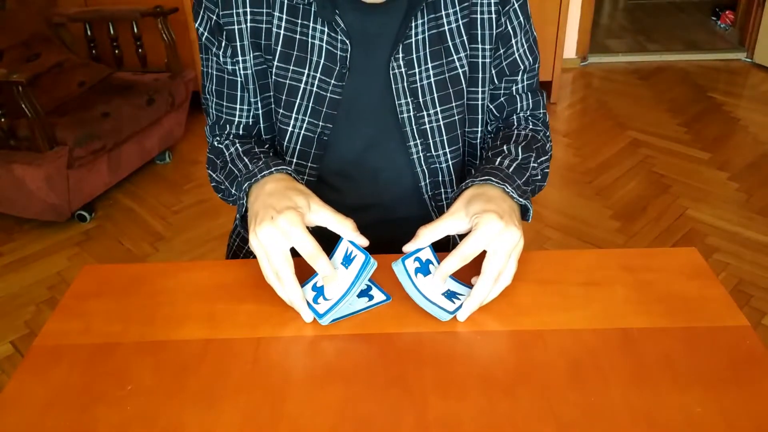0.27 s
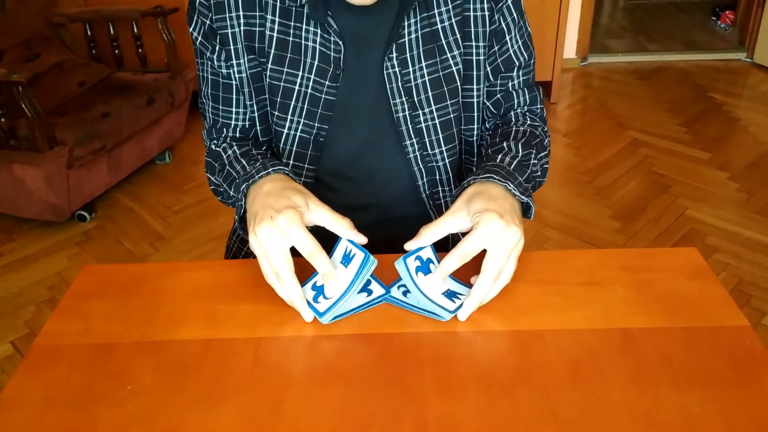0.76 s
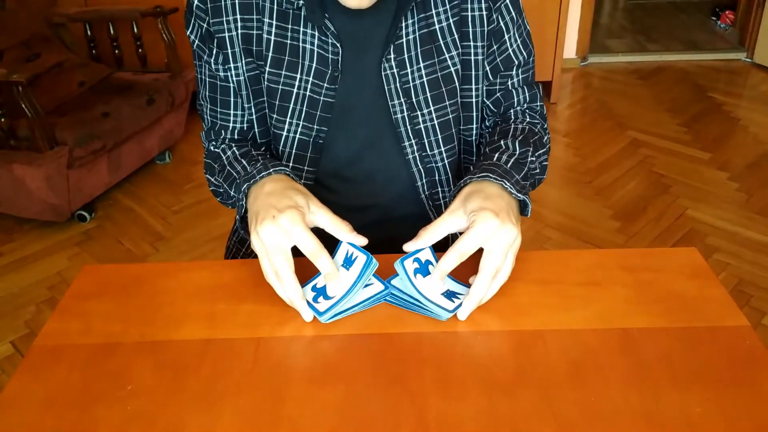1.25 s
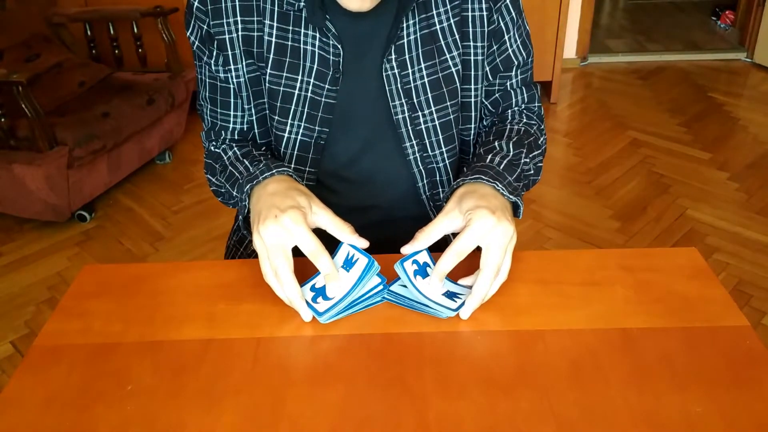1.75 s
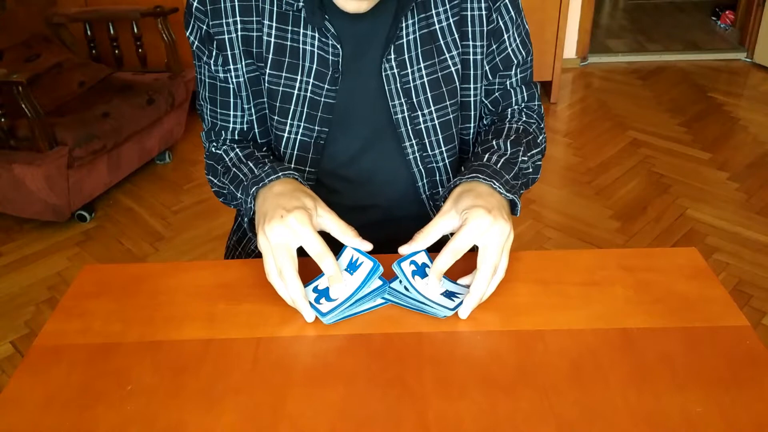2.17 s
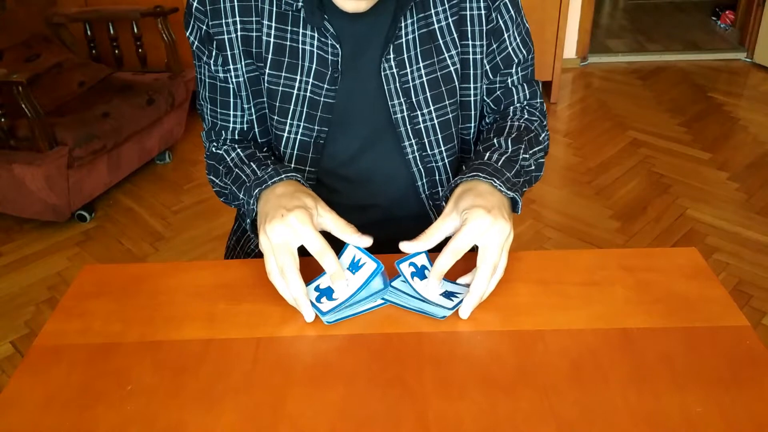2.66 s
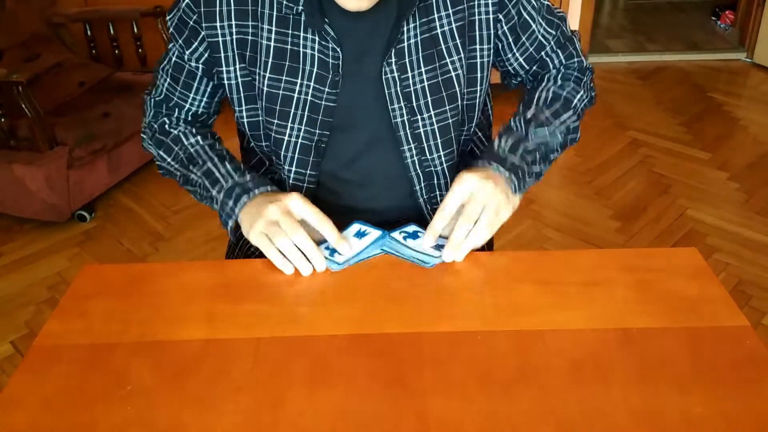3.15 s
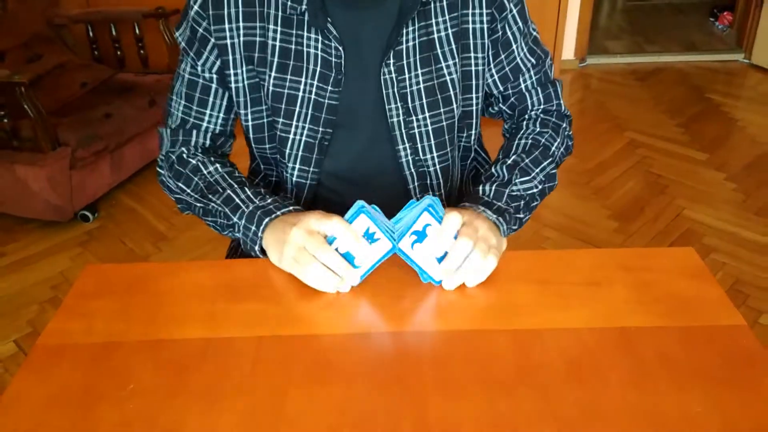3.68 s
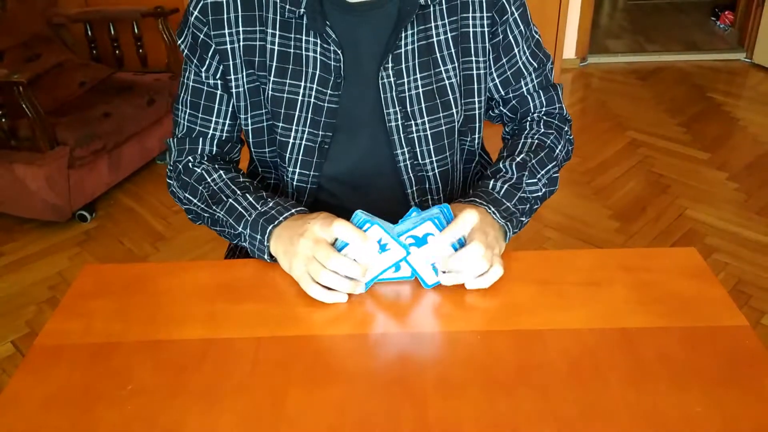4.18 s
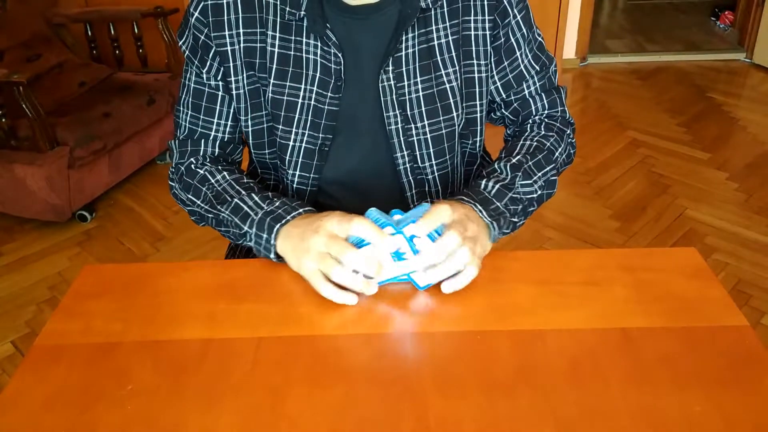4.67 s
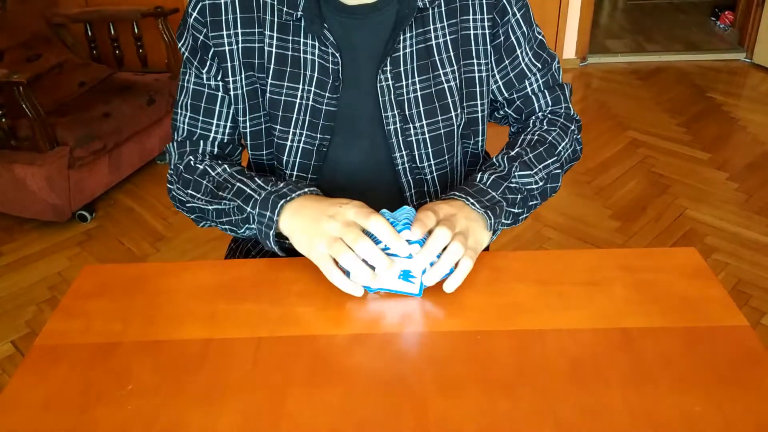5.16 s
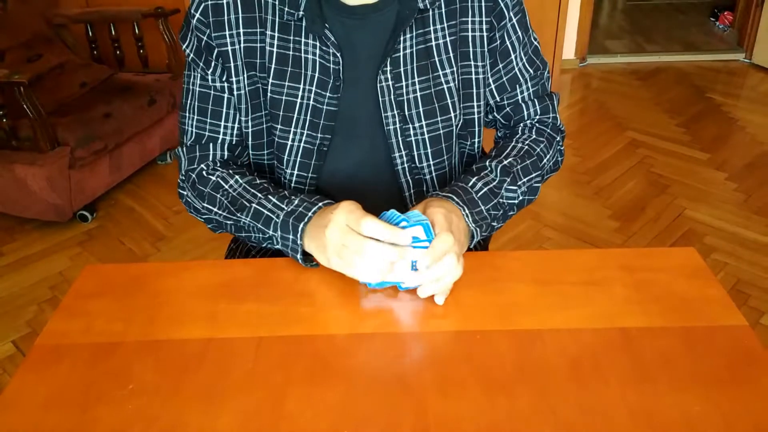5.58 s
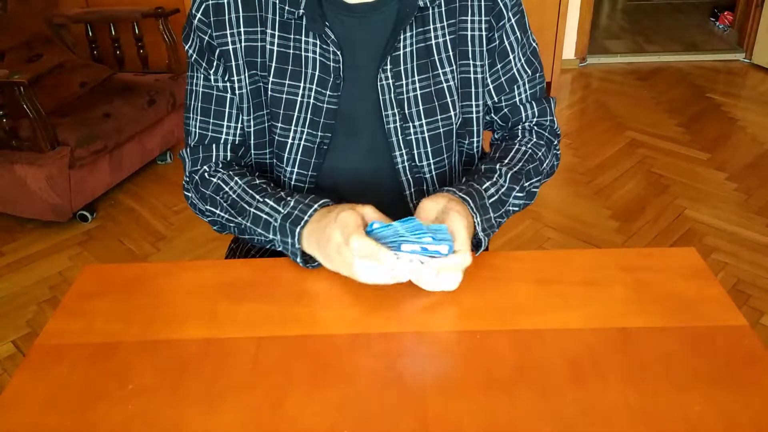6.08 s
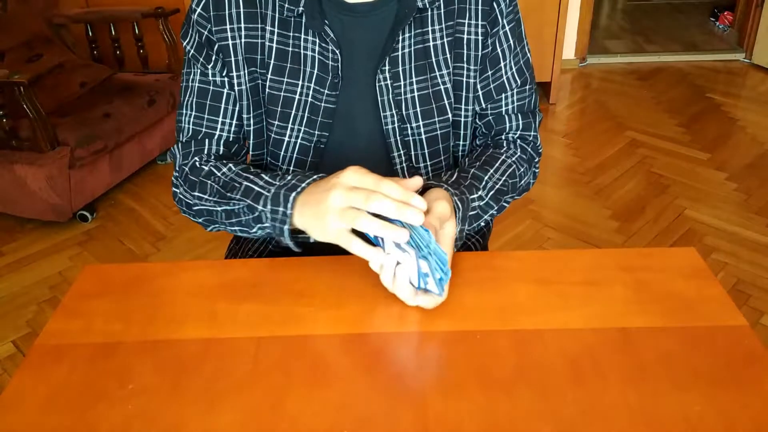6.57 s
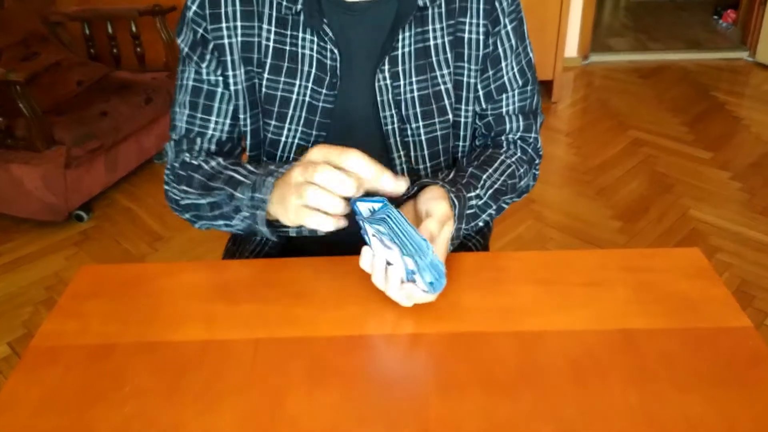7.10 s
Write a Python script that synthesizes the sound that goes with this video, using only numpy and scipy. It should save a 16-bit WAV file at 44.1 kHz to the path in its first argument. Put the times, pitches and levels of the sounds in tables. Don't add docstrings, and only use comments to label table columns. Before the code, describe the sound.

Playing cards flick sparsely off the thumbs, hiss together, buckle with papery snaps and get tapped square on a wooden table, then near silence.

```python
import sys
import numpy as np
from scipy import signal
from scipy.fft import rfft, irfft, next_fast_len
from scipy.io import wavfile
from scipy.ndimage import uniform_filter1d, minimum_filter1d

SR = 44100
rng = np.random.default_rng(int(sys.argv[2]) if len(sys.argv) > 2 else 0)


def wav_out(sig):
    wavfile.write(sys.argv[1], SR, np.round(np.clip(np.atleast_2d(sig).T, -1, 1) * 32767).astype(np.int16))


def invert_db(level):
    return 10 ** (np.asarray(level, dtype=float) / 20)


N = 323694


def unit(x):
    return x / np.sqrt(np.mean(x ** 2) + 1e-20)


def along(points, hz):
    f, v = np.transpose(points)
    return np.interp(np.log(hz + 1), np.log(f + 1), v)


def filtered(x, response):
    n = x.shape[-1]
    m = next_fast_len(n + 2048)
    return irfft(rfft(x, m) * response(np.fft.rfftfreq(m, 1 / SR)), m)[..., :n]


def colour(spectrum):
    return lambda hz: invert_db(along([(1, -120)] + list(spectrum) + [(SR / 2, -120)], hz))


def paired(two, alike):
    def turn(hz):
        return np.arccos(np.clip(along(alike, hz), -1, 1)) / 2
    mid, side = filtered(two, lambda hz: np.array([np.cos(turn(hz)), np.sin(turn(hz))]))
    return np.array([mid + side, mid - side])


def add(out, sound, s):
    out[:, round(s * SR):][:, :sound.shape[-1]] += sound


# f/Hz, t60/s
ROOM_DECAY = [(200, 0.3), (600, 0.33), (1500, 0.34), (4000, 0.37), (9000, 0.41), (11800, .41),
              (12600, 0.38), (16000, .27)]
# f/Hz, likeness/1
ROOM_COHERENCE = [(60, 0.65), (290, 0.92), (640, 0.24), (1400, 0.016), (3000, 0.0078)]


def room(x):
    hz, t, z = signal.stft(rng.standard_normal((2, SR // 3)), SR, nperseg=256)
    swell = 1 - np.exp(-(t / 0.006) ** 2)
    uneven_db = rng.normal(0, 3, (len(hz), 1)) + rng.normal(0, 1.5, len(t)) + rng.normal(0, 3, z.shape[1:])
    decay_db = -60 * t / along(ROOM_DECAY, hz)[:, None]
    tail = signal.istft(z * swell * invert_db(uneven_db + decay_db), SR, nperseg=256)[1]
    return signal.fftconvolve(x[None], paired(tail, ROOM_COHERENCE), axes=1)


# f/Hz, level/dB
SLAP_SPECTRUM = [(130, -27), (230, -8), (350, 1.5), (600, -4), (1000, -32)]
# f/Hz, level/dB
FLEX_SPECTRUM = [(300, -30.5), (700, 1.5), (1300, 3), (2300, -0.5), (3300, -9.5), (6000, -44.5)]
# f/Hz, level/dB
EDGE_SPECTRUM = [(1800, -11), (3500, -1), (5000, 0.5), (7500, -4), (11000, -26.5)]
# f/Hz, level/dB
TICK_SPECTRUM = [(5000, -25), (8500, -4.5), (11500, 4.5), (13500, 1.5), (15500, 0.5), (17000, -6)]


def card(x, levels_db):
    parts = (SLAP_SPECTRUM, FLEX_SPECTRUM, EDGE_SPECTRUM, TICK_SPECTRUM)
    return sum(invert_db(db) * unit(filtered(x, colour(part))) for db, part in zip(levels_db, parts))


def shares(hardness, duller_db, brighter_db):
    step = np.arange(4) - hardness
    return -np.maximum(step * brighter_db, -step * duller_db)


def strokes(rows, weights):
    s, rise, fall, db = np.transpose(rows)[:4, :, None]
    t = np.arange(0, N / SR, .001)
    swing_db = 25
    gains = np.transpose(weights) @ invert_db(db - swing_db * np.maximum((t - s) / fall, (s - t) / rise))
    return np.array([np.interp(np.arange(N) / SR, t, g) for g in gains])


# peak t/s, rise t/s, fall t/s, level/dB
ARM_SHIFTS = [(.3, 0.23, .25, -58), (.45, 0.03, 0.33, -41), (1.22, 0.55, 0.098, -59),
              (1.33, 0.03, 0.17, -46.5), (1.88, 0.2, 0.12, -53.5), (2.0, 0.17, 0.13, -56.5),
              (2.131, 0.14, 0.045, -57), (2.31, 0.21, 0.88, -56.5), (2.57, 0.071, 0.35, -49.5),
              (3.0, 0.021, 0.14, -56), (3.21, 0.049, 0.1, -44.5), (3.37, 0.1, 0.32, -44),
              (3.64, 0.031, 0.39, -44), (3.98, 0.12, 0.42, -46), (4.18, 0.77, 0.026, -49.5),
              (4.31, 0.14, 0.6, -68.5), (4.6, .3, .08, -60), (4.89, .15, 0.45, -54.5),
              (5.46, 0.13, 0.12, -51.5), (5.78, 0.66, 0.67, -79), (6.09, 1, 0.086, -56.5),
              (6.21, 0.066, 0.22, -70.5), (6.46, .5, 0.14, -68), (6.73, 0.12, 0.31, -54),
              (7.05, .4, 0.12, -62), (7.2, 0.16, 0.21, -56)]
# f/Hz, density/dB per Hz
RUMBLE_SPECTRUM = [(12, -33), (21, 4.5), (43, -2.5), (65, -10), (102, -8), (140, -20), (250, -26),
                   (320, -60.5), (550, -120)]
# f/Hz, density/dB per Hz
HISS_SPECTRUM = [(76, -39.5), (130, -8.5), (173, -1.5), (260, -13), (345, -9.5), (598, -12.5), (748, -12),
                 (1060, -16.5), (1830, -18), (1980, -18), (3730, -22.5), (14900, -18.5), (16800, -46)]


def background():
    rumble = filtered(rng.standard_normal((2, N)), colour(RUMBLE_SPECTRUM))
    rumble = unit(paired(rumble, [(30, .85), (130, .75)]))
    hiss = unit(filtered(rng.standard_normal((2, N)), colour(HISS_SPECTRUM)))
    resting_db, hiss_db = -72.5, -74.5
    arms = invert_db(resting_db) + strokes(ARM_SHIFTS, np.ones((len(ARM_SHIFTS), 1)))[0]
    return invert_db(-3.5) * arms * rumble + invert_db(hiss_db + 3.5) * hiss


# t/s, sheen level/dB
SHEEN_COURSE = [(.27, 4), (.46, -1.5), (.97, 10), (1.13, -5), (1.3, -6), (2.08, 2.5), (2.13, 10.5),
                (2.41, 6), (2.58, -3.5), (2.65, -7), (2.76, 7.5), (2.82, 2), (3.7, -1.5)]
# f/Hz, level/dB per dB of sheen
SHEEN_TILT = [(1200, 0), (3000, -1), (6000, -0.08), (9000, -0.15), (13000, 0.1), (16000, 0.3)]
DIRECT_DB = [-6, -6.5, -4.5, -1.5]


def snap(out, s, parts_db, walls_db, rebound_db):
    t = np.arange(SR // 50) / SR - .01
    crackle_s, lead_in_s, rebound_s = .0055, .009, .0018
    echo_db = [-30.5, -18.5, -12, -8.5]
    sheen_db = np.interp(s, *np.transpose(SHEEN_COURSE))

    def sheen(hz):
        return invert_db(sheen_db * along(SHEEN_TILT, hz))

    shape = invert_db(np.where(t > 0, -60 * t / crackle_s, -24 + 60 * t / lead_in_s))
    rebound = (t > rebound_s) * invert_db(rebound_db - 60 * (t - rebound_s) / crackle_s)
    crackle = rng.standard_normal(len(t)) * (shape + rebound)
    direct_db = np.add(parts_db, DIRECT_DB)
    add(out, filtered(card(crackle, direct_db), sheen), s - .01)
    echo = filtered(card(shape * rng.standard_normal(len(t)), direct_db + echo_db), sheen)
    add(out, echo * [[1], [.4]], s + t[0] + 0.0077)
    add(out, echo * [[.6], [-.6]], s + t[0] + .0103)
    impulse = t == t[len(t) // 2]
    add(out, invert_db(-38.5) * room(filtered(card(impulse, parts_db + walls_db), sheen)), s - .009)


# t/s, tick level/dB, weight of cards behind/dB, sent to walls/dB, rebound/dB
THUMB_FLICKS = [(0.265, -36.5, -0.5, 7, 0.5), (0.2826, -43.5, 9.5, 2, 9), (0.4564, -16.5, 10.5, 4, -13),
                (0.967, -35.5, 11, 7, -5), (1.0780, -43, -30, 1.5, 2), (1.1333, -31, -0.5, 2, -0.5),
                (1.2629, -38, 1.5, 1.5, -6), (1.3159, -42.5, 7.5, -5.5, -11), (2.0767, -31.5, -16, 8, 1),
                (2.1289, -27.5, -10, 0.5, -5), (2.4035, -54.5, -5.5, 20, -5), (2.4133, -31, -15, 4, -5.5),
                (2.5757, -37.5, -2, 2.5, -6), (2.644, -42, -14, 3.5, 1), (2.6527, -38, 8.5, 7.5, -4),
                (2.753, -32.5, -28, 4, -7), (2.7615, -25.5, 3.5, 5, -17), (2.8105, -38.5, 12, 3.5, 2),
                (2.8184, -38.5, 23.5, -7, -14), (3.7493, -47, 19.5, 2, -8), (3.95, -58.5, 12.5, 5, -11),
                (5.4985, -43, 23, -20, 7), (5.5218, -44, 15, 1.5, 4), (5.598, -47.5, 15, -20, -1),
                (6.5292, -61, 7.5, 3.5, -3), (0.9605, -47, 3, -6, 4), (2.069, -60, 0, -6, 1.5),
                (5.263, -54, -12, -6, -12), (4.772, -56.5, -8, -8, -4), (4.784, -42, -9, 5, 1),
                (3.2255, -42, -9, -12, -3), (7.279, -61.5, 3.5, 6, -4)]


def flicks():
    out = np.zeros((2, N + SR))
    close_db, walls_db = np.array([-22.5, -22, -9.5, -4]), np.array([0.9, 0.76, 1.3, 0.34])
    weight_share = np.array([1, 0.95, 0.017, 0])
    for s, db, weight, sent, rebound_db in THUMB_FLICKS:
        snap(out, s, db + close_db + weight * weight_share, walls_db + sent, rebound_db)
    return out[:, :N]


# t/s, f/Hz, level/dB, t60/s
SPRING_TONES = [(3.7839, 1090, -29.5, .015), (0.4559, 1380, -15, 0.014), (4.905, 555, -39, 0.069),
                (4.298, 4280, -32, 0.026), (0.4586, 1080, -22.5, 0.058), (0.456, 2860, -33.5, 0.042),
                (2.13, 262, -47.5, 0.075), (2.654, 480, -54, 0.029), (2.761, 710, -29.5, 0.011),
                (2.82, 942, -40.5, 0.058), (3.123, 1130, -52.5, 0.09), (4.017, 1070, -42, 0.035),
                (4.031, 690, -34.5, 0.12), (4.031, 1855, -32.5, 0.059), (4.033, 3130, -39, 0.019),
                (4.081, 1323, -31, 0.032), (4.299, 1420, -26, 0.039), (4.358, 1110, -56, 0.027),
                (4.628, 2160, -40.5, 0.043), (4.638, 693, -45, 0.037), (4.888, 883, -32, 0.2),
                (4.89, 1884, -26.5, 0.061), (5.206, 1105, -54.5, 0.12), (5.259, 3950, -25, 0.012),
                (5.271, 1560, -40, 0.007), (5.291, 2550, -33.5, 0.028), (5.352, 1102, -38, 0.16),
                (5.396, 1190, -34, 0.055), (5.458, 746, -33.5, 0.055), (5.482, 740, -36.5, 0.049),
                (5.545, 743, -45, 0.1), (5.594, 587, -46.5, 0.083), (5.761, 457, -34, 0.034),
                (5.775, 730, -33.5, 0.026), (5.83, 787, -42, 0.058), (5.882, 1072, -38.5, 0.1),
                (0.46, 1450, -31, .03), (.459, 282, -32.5, .06), (0.969, 2646, -39.5, 0.043),
                (2.079, 467, -42, 0.037), (2.414, 424, -42, 0.021), (4.04, 530, -33.5, 0.058),
                (4.12, 518, -38.5, 0.038), (4.305, 1163, -23, 0.027), (4.338, 1630, -26, .02),
                (4.8935, 2480, -19, 0.013), (4.9, 512, -45.5, 0.074), (4.84, 704, -48, 0.036),
                (5.885, 595, -38, 0.07), (5.893, 711, -35, 0.048), (4.685, 4430, -40, 0.011),
                (5.97, 1900, -46, .02), (.27, 687, -49, 0.04)]


def twangs():
    out, t = np.zeros((2, N + SR)), np.arange(SR // 8) / SR
    rise_s, walls_db = 0.00042, -33.5
    for s, hz, db, t60 in SPRING_TONES:
        ring = invert_db(db - 60 * t / t60) * np.sin(2 * np.pi * hz * t) * (1 - np.exp(-t / rise_s))
        add(out, ring, s)
        add(out, invert_db(walls_db) * room(ring), s)
    return out[:, :N]


# t/s, length/s, level/dB, hardness (0 slap - 3 tick), narrowness/dB a step
SOFT_TOUCHES = [(2.753, .002, -45, 3.5, 9), (.4545, .0015, -40.5, 2, 5), (0.441, 0.00091, -45.5, 0.99, 6),
                (0.879, 0.0051, -62.5, 3, 12), (2.555, 0.016, -59, 2.9, 6.5),
                (3.147, 0.026, -44.5, 2.27, 20), (3.384, 0.0083, -52, 0.06, 7.5),
                (3.372, 0.0075, -56, 3, 21), (3.569, 0.076, -65, 2.32, 8), (4.03, 0.0079, -39, 0.52, 19),
                (4.298, 0.0032, -36, 0.9, 16), (5.136, 0.03, -52.5, 2.44, 26),
                (5.23, 0.025, -57.5, 0.17, 17), (5.358, 0.014, -39.5, 0.78, 17),
                (5.407, 0.011, -39.5, 1.04, 17.5), (5.446, 0.012, -43.5, 0.97, 13.5)]


def brushes():
    out, u = np.zeros((2, N + SR)), np.arange(-SR // 10, SR // 10) / SR
    for s, length, db, hardness, narrow_db in SOFT_TOUCHES:
        noise = card(rng.standard_normal(len(u)), db + shares(hardness, narrow_db, narrow_db))
        brush = noise * np.exp(-(u / length) ** 2)
        add(out, brush, s + u[0])
        add(out, invert_db(-28.5) * room(brush), s + u[0])
    return out[:, :N]


# f/Hz, level/dB, t60/s
TABLE_MODES = [
    [(81.13, 0.5, 0.084), (139, -2, 0.2), (175, -3.5, 0.26)],
    [(263.1, -8.5, 0.18), (306.4, -2, 0.33)],
    [(389, 2, 0.4), (496, -14, 0.43), (570, -21, .12), (698, -9.5, 0.26), (888, -21.5, 0.34)],
]
# t/s, low modes level/dB, middle level/dB, high level/dB, rise t/s
TABLE_BLOWS = [(.453, -31.5, -35, -36.5, 0.012), (.968, -52, -43.5, -48, 0.0055),
               (2.076, -67.5, -58.5, -66, 0.0079), (2.41, -79, -60.5, -75, 0.0012),
               (2.651, -81, -68, -71, 0.0032), (2.758, -54.5, -78, -57.5, 0.0019),
               (3.224, -61, -47.5, -42, 0.0043), (3.24, -72, -63, -41.5, 0.0033),
               (3.486, -74, -70, -59.5, 0.00057), (3.737, -50.5, -46, -51.5, 0.0031),
               (5.233, -62.5, -61.5, -51.5, 0.0026), (5.764, -55.5, -59, -57, 0.0041),
               (5.861, -63, -38.5, -62, 0.0077), (5.877, -46, -32, -40, 0.017)]


def knocks():
    out, t = np.zeros((2, N + SR)), np.arange(SR // 2) / SR
    choke_db = 13 * (t / 0.17) ** 4
    for s, *groups_db, rise in TABLE_BLOWS:
        for group_db, modes in zip(groups_db, TABLE_MODES):
            ring = 0
            for hz, level, t60 in modes:
                decay = invert_db(level + rng.normal(0, 0.98) - 60 * t / t60)
                ring = ring + decay * np.sin(2 * np.pi * hz * t)
            add(out, invert_db(group_db + 6.5 - choke_db) * ring * (1 - np.exp(-t / rise)), s)
    return out[:, :N]


# t/s, length/s, level/dB, f/Hz
EDGE_SQUEAKS = [(0.976, 0.0092, -39, 2860), (3.154, 0.0084, -55, 1150), (3.568, 0.0087, -56.5, 3000),
                (3.791, 0.01, -41, 1270), (5.274, 0.0082, -37, 3230), (5.751, 0.012, -59, 585),
                (5.77, 0.0074, -59, 920), (5.841, 0.018, -51.5, 1100), (6.246, 0.0047, -59, 3220),
                (6.247, 0.0041, -64.5, 1230), (6.271, 0.016, -64.5, 3100), (6.829, 0.0093, -66, 2050),
                (6.45, 0.01, -59, 2600), (6.798, 0.0059, -60, 2090), (7.298, 0.03, -65, 5520),
                (7.288, 0.0096, -68.5, 7520), (7.29, 0.019, -70, 2950)]


def squeaks():
    out, u = np.zeros((2, N + SR)), np.arange(-SR // 10, SR // 10) / SR
    width, skirt_db = 1.36, -7
    for s, length, db, hz in EDGE_SQUEAKS:
        band = [(hz / width, skirt_db), (hz, 0), (hz * width, skirt_db)]
        noise = unit(filtered(rng.standard_normal(len(u)), colour(band)))
        puff = invert_db(db) * noise * np.exp(-(u / length) ** 2)
        add(out, puff, s + u[0])
        add(out, invert_db(-31.5) * room(puff), s + u[0])
    return out[:, :N]


def rubbing(spectrum, rate, spread_db):
    sizes = invert_db(spread_db * rng.standard_normal((2, N))) * rng.standard_normal((2, N))
    grains = (rng.random((2, N)) < rate / SR) * sizes
    return unit(filtered(unit(grains) + 2.1 * rng.standard_normal((2, N)), colour(spectrum)))


# f/Hz, level/dB
THRUM_SPECTRUM = [(250, -12), (450, 2.5), (750, -3.5), (1100, -15), (1800, -20.5)]
# peak t/s, rise t/s, fall t/s, level/dB, hardness (0 thrum - 3 hiss)
SLIDE_STROKES = [(3.087, 0.046, 0.22, -36.5, 3.5), (3.18, 0.19, 0.22, -40, 3),
                 (3.14, 0.15, 0.17, -32.5, 3.5), (3.228, 0.039, 0.083, -29.5, 3.5),
                 (3.232, 0.042, 0.14, -38, 1.52), (3.818, 0.11, 0.067, -38.5, 0.49),
                 (4.11, 0.22, 0.11, -49, 5), (4.29, 0.053, .2, -63, 6), (4.8, 0.06, 0.23, -60, 4),
                 (4.85, 0.033, 0.26, -47.5, 1), (4.781, 0.029, 0.09, -31.5, 3.5),
                 (4.945, 0.081, 0.097, -35.5, 3), (5.02, 0.46, 0.023, -44, 1.34),
                 (5.29, .02, 0.065, -55.5, 3.5), (5.391, 0.16, 0.46, -50.5, 0),
                 (5.457, 0.094, 0.046, -39.5, 0.5), (5.452, 0.029, 0.055, -34.5, 3.5),
                 (5.501, 0.01, 0.021, -41, 2.5), (5.52, 0.015, 0.15, -46, 2.5),
                 (5.591, 0.026, 0.07, -37.5, 0.5), (5.606, 0.016, 0.07, -41.5, 3),
                 (5.766, 0.065, 0.18, -27, -1.5), (5.886, 0.046, 0.13, -30.5, 0.35),
                 (5.881, 0.015, 0.072, -44, 2.44)]


def slides():
    layers = np.array([rubbing(THRUM_SPECTRUM, rate=370, spread_db=8),
                       rubbing(FLEX_SPECTRUM, rate=530, spread_db=5),
                       rubbing(EDGE_SPECTRUM, rate=4000, spread_db=1.5),
                       rubbing(TICK_SPECTRUM, rate=5000, spread_db=3)])
    weights = [invert_db(shares(row[-1], duller_db=13.5, brighter_db=23)) for row in SLIDE_STROKES]
    gains = strokes(SLIDE_STROKES, weights)
    return paired((gains[:, None] * layers).sum(axis=0), [(400, 0.87), (1500, 0.043), (6000, 0.082)])


# t/s, flex level/dB, weight/dB, crispness/dB, sent to walls/dB
PACKET_BENDS = [(3.7839, -43.5, 15.5, -3, -5), (4.0307, -36, -5.5, -4.5, 5), (4.081, -42.5, -13, 2, 10),
                (4.11, -42.5, -9, 4, 7), (4.3, -33, -4, 3, -12), (4.304, -32.5, -1, 6, 7.5),
                (4.3394, -43, 9, -2.5, 9), (4.3584, -37.5, 2, -1, 7), (4.6283, -39, 0.5, -3, 8),
                (4.6918, -40, 0, -8, -3), (4.7548, -51.5, -32, 18, 2.5), (4.8293, -48.5, -3.5, 7, -14.5),
                (4.8884, -32.5, 5.5, 10, 7.5), (4.8914, -35, 4, 6.5, 7), (4.885, -47, 2, 5, -6),
                (5.8808, -45.5, 8, 0.5, -9), (5.26, -42.5, 2.5, 9.5, 11), (5.2724, -42.5, 0.5, 14, 3),
                (5.7676, -81, 48, -9, -5), (5.7758, -88, 47, 2, 13), (5.97, -63.5, 16.5, 18.5, 5)]


def bends():
    out = np.zeros((2, N + SR))
    close_db, walls_db = np.array([-16.5, 0, -13.5, -27]), np.array([1, 1.5, -7.5, 2.5])
    for s, db, weight, crisp, sent in PACKET_BENDS:
        snap(out, s, db + close_db + [weight, 0, crisp, crisp], walls_db + sent, rebound_db=-10)
    return out[:, :N]


# f/Hz, left minus right level/dB
PAIR_BALANCE = [(90, 8), (300, -1.5), (2500, -1), (5000, -.5), (9000, -5.5), (12500, -3)]


def aimed(x):
    return filtered(x, lambda hz: invert_db(np.outer([.5, -.5], along(PAIR_BALANCE, hz))))


# f/Hz, level/dB
GATE_THRESHOLD = [(200, -73.5), (1000, -59), (4000, -54.5), (9000, -58.5), (14000, -64.5)]


def denoised(x):
    hz, _, z = signal.stft(x, SR, nperseg=512)
    power = np.mean(np.abs(z) ** 2, axis=0)
    power = uniform_filter1d(uniform_filter1d(power, 25, axis=0), 5, axis=1)
    over = np.abs(power) / invert_db(along(GATE_THRESHOLD, hz)[:, None] - 26.5) ** 2
    over = np.sqrt(over * over.mean(axis=0)) ** 3
    return signal.istft(z * over / (1 + over), SR, nperseg=512)[1][:, :N]


def scene():
    cards = flicks() + twangs() + brushes() + knocks() + squeaks() + slides() + bends()
    return denoised(aimed(cards)) + background()


# f/Hz, level/dB
TREBLE_FLOOR = [(12300, -75), (13000, -43), (13600, -35), (15000, -31), (15800, -23), (16500, -15)]
# f/Hz, level/dB
NEIGHBOUR_FLOOR = [(1800, -60), (2600, -7), (3800, -4.2), (9000, -3.8), (11500, -4.2), (15000, -3.5)]


def spectrally_gated(x):
    hz, _, z = signal.stft(x, SR, nperseg=2048)
    power = np.mean(np.abs(z) ** 2, axis=0)
    narrow, band, wide = [np.abs(uniform_filter1d(power, size=n, axis=0)) for n in (9, 33, 45)]
    midrange = power[(hz > 300) & (hz < 3000)].mean(axis=0)
    strong = band > midrange * invert_db(along(TREBLE_FLOOR, hz)[:, None]) ** 2
    distinct = narrow > wide * invert_db(along(NEIGHBOUR_FLOOR, hz)[:, None]) ** 2
    kept = minimum_filter1d((strong & distinct) * 1., size=7, axis=0)
    kept = minimum_filter1d(kept, size=2, axis=1)
    return signal.istft(z * kept, SR, nperseg=2048)[1][:, :N]


def band_limit(x):
    return signal.sosfilt(signal.butter(12, 16970, fs=SR, output="sos"), x)


# f/Hz, level/dB
TREBLE_RESPONSE = [(4300, 0), (4750, -2.5), (5200, 0), (7900, 0), (8400, -1.5), (9000, 0), (15700, 0),
                   (16200, -24)]


def record(dry):
    def ports(hz):
        phase = np.minimum(np.pi * hz * 1.1 / SR, .55)
        return invert_db(along(TREBLE_RESPONSE, hz)) * np.exp(np.outer([-1, 1], 1j * phase))

    ceiling = .8
    rounded = dry / (1 + np.abs(dry / ceiling) ** 4) ** .25
    mix = spectrally_gated(filtered(rounded, ports))
    return band_limit(mix)


dry = scene()
out = record(dry)
wav_out(out)
```